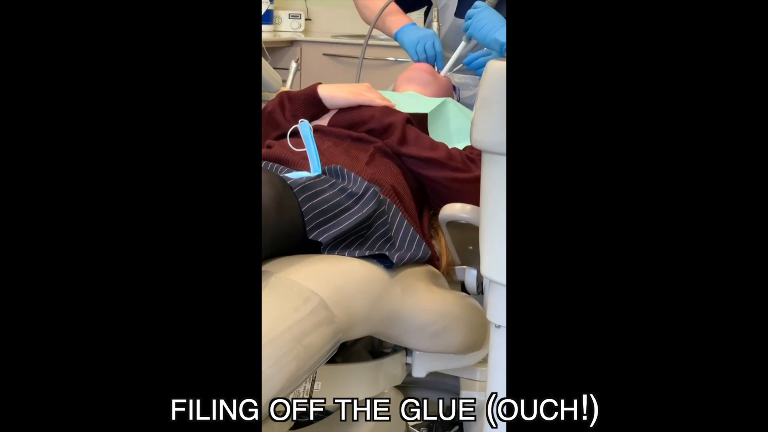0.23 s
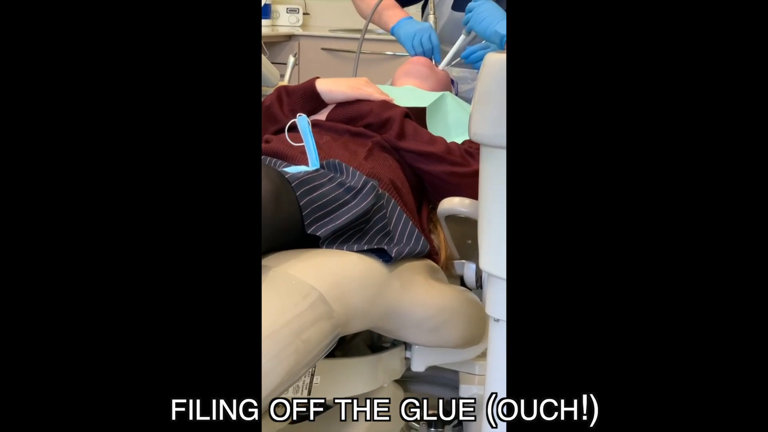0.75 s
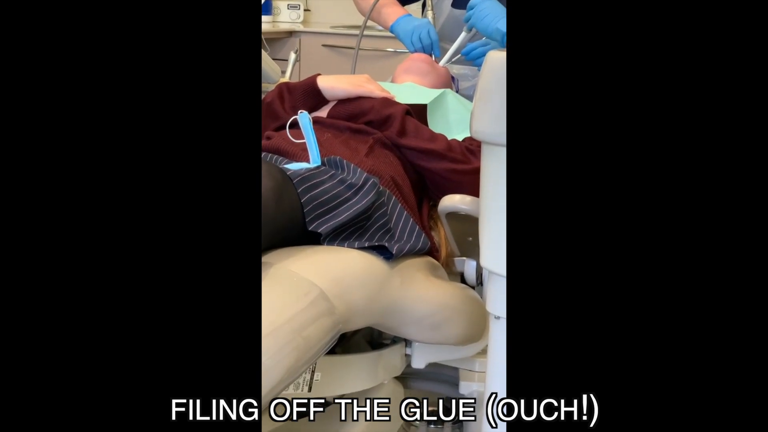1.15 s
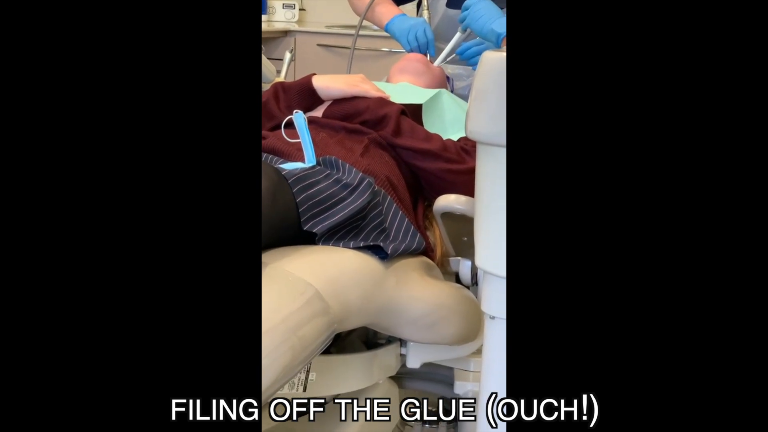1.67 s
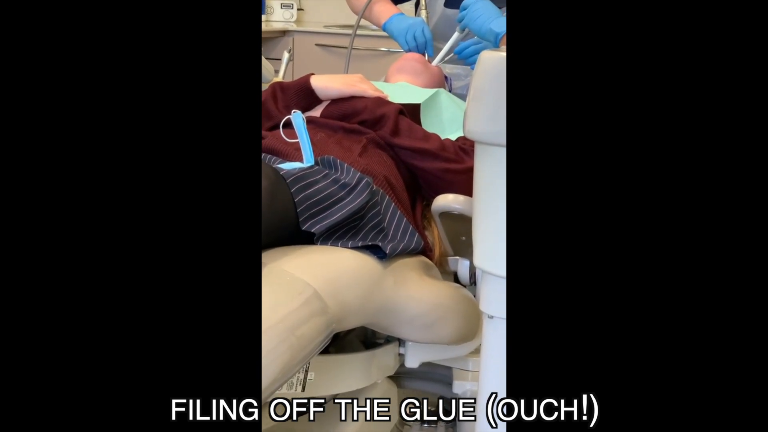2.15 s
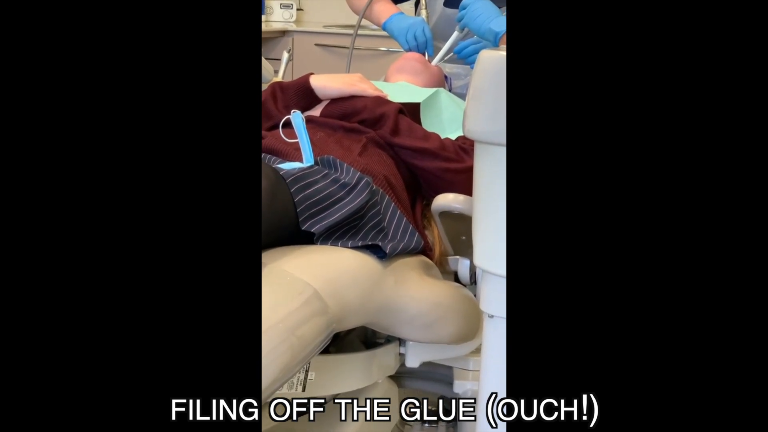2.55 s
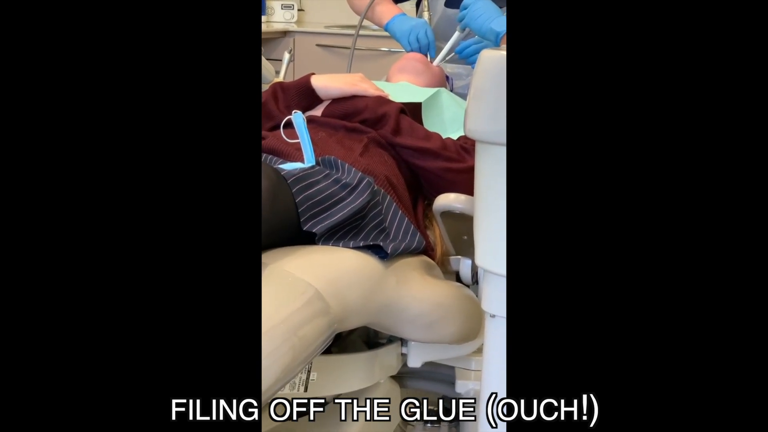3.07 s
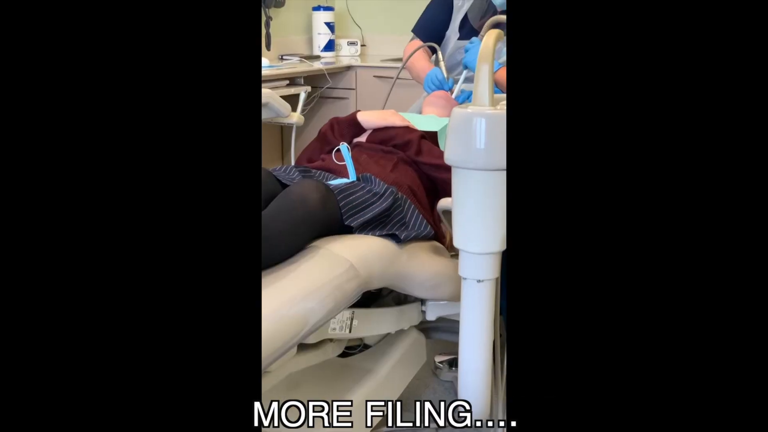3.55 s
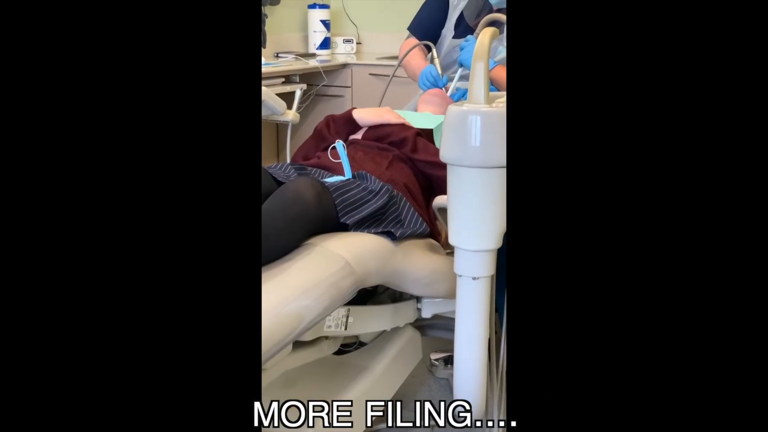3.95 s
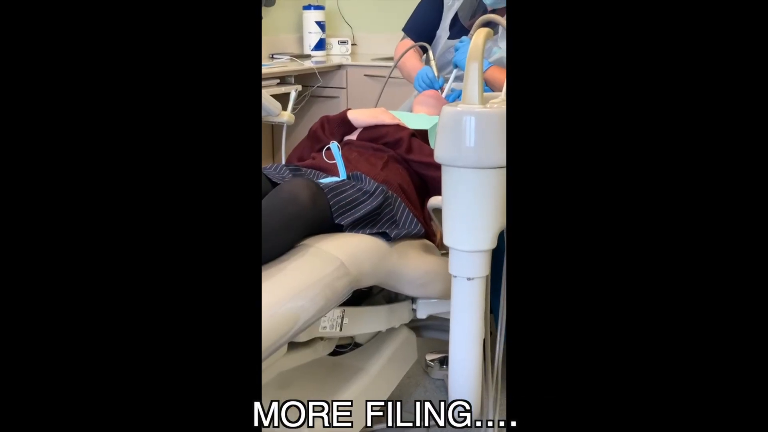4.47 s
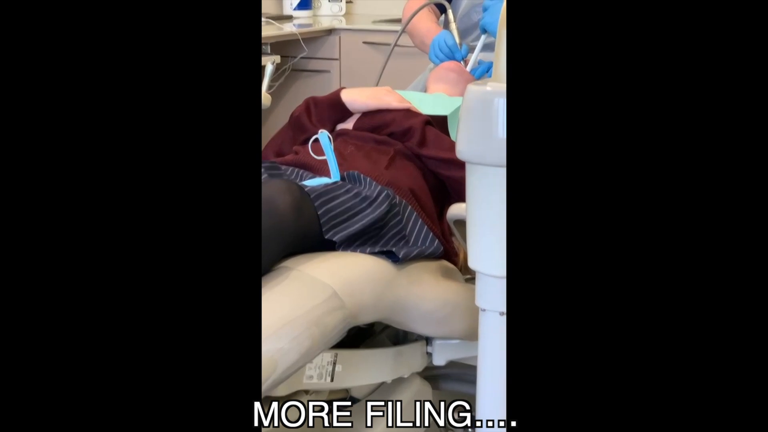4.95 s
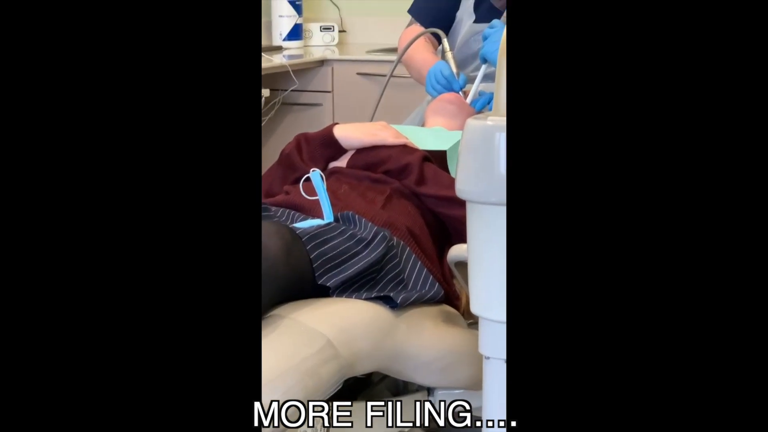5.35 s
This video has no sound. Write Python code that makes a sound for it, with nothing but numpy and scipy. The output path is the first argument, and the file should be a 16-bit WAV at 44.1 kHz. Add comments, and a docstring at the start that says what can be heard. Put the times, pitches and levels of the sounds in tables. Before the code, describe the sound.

Continuous high airy hiss of dental grinding and suction, picked up in stereo from near the chair. Short scraping bites brighten it, thin whistles waver and choke, and a few wet plops pop. Low pump throb, electrical hum, faint whine and ventilation fill the small room. After an abrupt cut just past halfway the air is more hollow and the hum stronger, then a heavy low drone rises while sinking in pitch.

```python
"""A dental handpiece grinds adhesive off teeth: a bright jet hiss that scrapes and spits grit as the bur bites.
In the same open mouth a suction tip hisses (noise through resonances) and whistles (narrow noise bands), and
saliva plops as short falling tones. Behind them in the small clinic stand a throbbing pump, mains hum, a thin
whine, a hollow hum and ventilation rumble, all heard in stereo. Part-way the scene jumps to a later moment
with the tip placed differently; near the end a low motor drone swells and sinks in pitch."""
import sys
import numpy as np
from scipy import signal
from scipy.fft import rfft, irfft
from scipy.io import wavfile

SR = 44100
rng = np.random.default_rng(int(sys.argv[2]) if len(sys.argv) > 2 else 0)


def transcribe(signal):
    """Save signal, clipped to [-1, 1], as a 16-bit WAV file at the path in sys.argv[1]."""
    frames = np.atleast_2d(signal).T
    limited = np.clip(frames, -1, 1)
    pcm = np.round(limited * 32767).astype(np.int16)
    wavfile.write(sys.argv[1], SR, pcm)


N = 247611
TIME = np.arange(N) / SR
FREQS = np.maximum(np.arange(N // 2 + 1) * SR / N, 1)


def from_db(db):
    """Decibels to gain."""
    return 10 ** (np.asarray(db) / 20)


def rms_one(x):
    """Scale to unit rms."""
    return x / np.sqrt(np.mean(x ** 2) + 1e-20)


def in_time(rows):
    """Each column of a curve at every sample."""
    seconds, *columns = np.transpose(rows)
    return [np.interp(TIME, seconds, column) for column in columns]


def over_hz(points, column=1):
    """A table joined by straight lines on a log-frequency axis."""
    table = np.transpose(points)
    return np.interp(np.log(FREQS), np.log(table[0]), table[column])


def fade_in(start, length):
    """A ramp from 0 to 1; start and length in seconds."""
    return np.clip((TIME - start) / length, 0, 1)


def drift(rate):
    """Random wander with unit rms, falling off steeply above a rate in Hz."""
    return rms_one(irfft(rfft(rng.standard_normal(N)) / (1 + (FREQS / rate) ** 2) ** 2, N))


def bend(pair, share):
    """Raise every pitch in a stereo sound by a share that changes with time."""
    steps = np.arange(N)
    read_at = (steps + np.cumsum(share)) % N
    return np.array([np.interp(read_at, steps, side) for side in pair])


def fine_ripple(depth_db, spread_s):
    """A random fine unevenness of the spectrum, in dB; a longer spread makes it finer."""
    dying_noise = rng.standard_normal(N) * np.exp(-np.minimum(TIME / spread_s, 50))
    return depth_db * rms_one(rfft(dying_noise).real)


# Left-right correlation of the hiss by frequency. Each row: frequency in Hz, correlation (0-1).
STEREO_LIKENESS = [(50, .999), (250, .93), (550, .62), (800, .42), (1500, .42), (2100, .4), (2500, .8),
                   (2850, .8), (3250, .68), (3850, .44), (4350, .52), (4580, 1), (5550, 1), (5850, .74),
                   (6450, .58), (7200, .92), (7700, 1), (9400, .99), (10200, .62), (10750, .64), (11100, 1)]
# Left-right phase of the hiss by frequency. Each row: frequency in Hz, phase by which left leads in radians.
STEREO_LEAD = [(50, 0), (560, -.5), (1000, .3), (1850, .65), (2400, 3.1), (3200, 3.1), (3950, 1.9),
               (4580, 3.14), (5550, 3.14), (6200, 4.3), (7200, 6.2), (9400, 6.28), (10200, 7.1),
               (11100, 9.425)]


def stereo_noise(colour_db, lead):
    """Noise of a given dB per Hz on two sides: a shared part, an unrelated part and a phase lead on the left."""
    mid, side = rfft(rng.standard_normal((2, N)))
    alike = np.clip(over_hz(STEREO_LIKENESS), 0, 1)
    sign = np.array([[1], [-1]])   # left, right
    pair = np.sqrt(1 + alike) * mid + sign * np.sqrt(1 - alike) * side
    pair = pair * np.exp(.5j * sign * lead)
    return irfft(pair * from_db(colour_db), N) * np.sqrt(SR) / 2


# Ventilation rumble of the clinic. Each row: frequency in Hz, density in dB relative to the room level.
ROOM_COLOUR = [(20, -4), (45, 5), (80, 2), (125, -5.5), (200, 0), (320, 0), (400, -2.5), (520, -7.5),
               (900, -20.5), (3000, -22)]


def ventilation(level_db):
    """Moving air fills the room with broad noise, heaviest in the lows."""
    return from_db(level_db) * stereo_noise(over_hz(ROOM_COLOUR), over_hz(STEREO_LEAD))


# The two notes of the hollow hum. Each row: pitch in Hz, level in dB relative to the swell.
HOLLOW_NOTES = [(257, -2.5), (287, -6)]
# Its swells out of a faint bed. Each row: start in seconds, swell level in dB at the top of the rise.
HOLLOW_RISES = [(0.85, -47.5), (2.6, -53.5)]
HOLLOW_BED_DB, HOLLOW_RISE_S, HOLLOW_FALL_DB_PER_S = -65.5, 0.13, 9.5


def hollow_hum(waver_rad):
    """Two close, unsteady tones that stay faint between swells: a quick rise, a slow fall."""
    swell = from_db(HOLLOW_BED_DB)
    for start, db in HOLLOW_RISES:
        falling_s = np.maximum(TIME - start - HOLLOW_RISE_S, 0)
        rise = fade_in(start, HOLLOW_RISE_S)
        swell = np.maximum(swell, rise * from_db(db - HOLLOW_FALL_DB_PER_S * falling_s))
    tones = 0
    for hz, db in HOLLOW_NOTES:
        tones = tones + from_db(db) * np.sin(2 * np.pi * hz * TIME + waver_rad * drift(2.6))
    return np.sqrt(2) * swell * tones


# Mains and machine tones. Each row: pitch in Hz, rms level in dB before the jump, rms level in dB after it.
HUM_TONES = [(99.8, -52, -40.5), (144.7, -59.5, -55), (199.4, -58.5, -68.5), (298.6, -55.5, -63),
             (337, -61.5, -55)]


def hum(late, waver_rad):
    """Steady tones of the equipment; the higher ones waver more in phase."""
    out = 0
    for hz, early_db, late_db in HUM_TONES:
        waver = waver_rad * (hz / HUM_TONES[0][0]) ** 2 * drift(20.0)
        phase = 2 * np.pi * (hz * TIME + rng.random()) + waver
        level_db = early_db + late * (late_db - early_db)
        out = out + np.sqrt(2) * np.sin(phase) * from_db(level_db)
    return out


# The pump's mean level at the top of its throb, before and after the jump.
PUMP_EARLY_DB, PUMP_LATE_DB = -42.5, -38
THROB_HZ, THROB_TROUGH_S, THROB_DEPTH = 2.98, .29, 0.7   # rate, time of one trough, depth (0-1)


def pump(late, hz, second_db, unsteady_db):
    """An induction motor just under mains speed throbs in long swells; its second order beats with the hum."""
    swell = np.abs(np.sin(np.pi * THROB_HZ * (TIME - THROB_TROUGH_S)))   # brief troughs
    throb = 1 - THROB_DEPTH * (1 - swell)
    level_db = PUMP_EARLY_DB + late * (PUMP_LATE_DB - PUMP_EARLY_DB) + unsteady_db * drift(7.4)
    phase = 2 * np.pi * np.cumsum(hz + 0.1 * drift(1.6)) / SR
    first = from_db(level_db) * throb * np.sin(phase)
    second = from_db(second_db) * np.sin(2 * phase)
    return np.sqrt(2) * (first + second)


# The swelling motor drone. Each row: time in seconds, pitch in Hz, rms level of the fundamental in dB.
DRONE_PATH = [(4.3, 46.1, -45), (4.52, 44, -39), (4.68, 44, -30), (4.87, 43.57, -28.5),
              (5.08, 42.37, -25.5), (5.61, 42, -23)]


def drone(second_db, third_db):
    """A heavy motor slows and grows louder, nearly a pure tone that beats against the pump."""
    hz, level_db = in_time(DRONE_PATH)
    phase = 2 * np.pi * np.cumsum(hz) / SR
    tone = np.sin(phase) + from_db(second_db) * np.sin(2 * phase) + from_db(third_db) * np.sin(3 * phase)
    return np.sqrt(2) * tone * from_db(level_db) * fade_in(DRONE_PATH[0][0], 0.058)


# A small motor's thin whine. Each row: time in seconds, level in dB, 2 dB above the mean whine,
# before the flicker.
WHINE_LEVEL = [(0, -52.5), (1.2, -55.5), (1.7, -48.5), (3.1, -52), (3.3, -66.5), (5.6, -56.5)]
WHINE_HZ = 1786   # centre pitch


def whine(waver_rad, wander_hz):
    """A small motor's tone, wavering in pitch and strength."""
    level_db, = in_time(WHINE_LEVEL)
    hz = WHINE_HZ + wander_hz * drift(5.8)
    phase = 2 * np.pi * np.cumsum(hz) / SR + waver_rad * drift(27)
    return np.sqrt(2) * np.sin(phase) * from_db(level_db - 2 + 4 * drift(25))


# Saliva bursting in the mouth. Each row: start in seconds, level in dB before the common gain,
# settled pitch in Hz, opening snap in dB relative to that level.
SALIVA_PLOPS = [(1.2875, -33, 644, -9), (1.314, -36, 745, -13), (1.6015, -34.5, 620, -8),
                (1.6203, -37.5, 720, -4), (3.131, -29.5, 600, -1.5), (3.857, -32.5, 690, -17),
                (4.5563, -30, 600, -14)]


def plops(gain_db, t60, sweep, sweep_s, snap_hz, snap_t60):
    """A film of saliva bursts with a brief snap, then a few cycles fall in pitch as the pocket opens."""
    out = np.zeros(N)
    t = TIME[:SR // 20]
    snap = from_db(-60 * t / snap_t60) * np.sin(2 * np.pi * snap_hz * t)
    for start, db, hz, snap_db in SALIVA_PLOPS:
        # the pitch starts a share "sweep" above hz and settles within a few times sweep_s seconds
        phase = 2 * np.pi * hz * (t + sweep * sweep_s * (1 - np.exp(-t / sweep_s)))
        pocket = np.sin(phase) * (1 - np.exp(-t / 0.00077)) * from_db(-60 * t / t60)
        at = round(start * SR)
        out[at:at + len(t)] += (pocket + from_db(snap_db) * snap) * from_db(db + gain_db)
    return out


# Whistles at the tip. Each row: pitch in Hz, width in Hz, dB per Hz at full draw before the jump,
# the same after it (both before the common gain), phase by which left leads in radians.
TIP_WHISTLES = [(1396, 19, -58, -78, 0.97), (2068, 22, -61, -84, 1.94), (4150, 80, -68.5, -92, 1.4)]
# Draw of the tip. Each row: time in seconds, level in dB; only the shortfall from its peak counts.
TIP_DRAW = [(0.0, -50.5), (1.1, -51), (1.7, -48), (2.4, -48.6), (2.85, -48), (3.25, -48.5)]
# Saliva briefly chokes the tip. Each row: centre in seconds, loss in dB.
TIP_CHOKES = [(0.38, 17), (0.75, 21), (1.06, 10), (1.53, 5)]
CHOKE_S = 0.06   # from the centre to 1/e of the loss
HIGH_WHISTLE_LOSS = 0.8   # extra loss of the higher whistles, dB per dB of missing draw
WHISTLE_SHARP_PER_DB = .0035   # a weak draw runs sharp: share of pitch per dB


def whistles(late, gain_db, flicker_db):
    """Edge tones at the tip: narrow, wavering resonances that grow with the draw and drop when it is choked."""
    draw_db, = in_time(TIP_DRAW)
    shortfall_db = draw_db.max() - draw_db
    choke_db = sum(db * np.exp(-((TIME - s) / CHOKE_S) ** 2) for s, db in TIP_CHOKES)
    sharp = WHISTLE_SHARP_PER_DB * shortfall_db + 0.003 * drift(10)
    out = 0
    for k, (hz, width, early_db, late_db, lead) in enumerate(TIP_WHISTLES):
        shape_db = -20 * np.log10(1 + ((FREQS - hz) / width) ** 2)
        level_db = early_db + late * (late_db - early_db)
        level_db = level_db - shortfall_db - choke_db + flicker_db * drift(14)
        if k > 0:
            level_db = level_db - HIGH_WHISTLE_LOSS * shortfall_db
        out = out + bend(stereo_noise(shape_db, lead), sharp) * from_db(level_db)
    return out * from_db(gain_db)


# Air through the tip. Each row: frequency in Hz, dB per Hz before resonances, ripple and gain.
AIR_RUSH = [(200, -83), (520, -83.5), (900, -78.5), (1300, -75), (1900, -81.5), (2500, -77), (3800, -75),
            (4400, -74.5), (5200, -128), (11500, -105)]
# Mouth and tip resonances before the jump. Each row: centre in Hz, width in Hz, lift in dB.
CAVITIES_EARLY = [(962, 160, 2.5), (1236, 150, 4), (1520, 280, 5), (1820, 140, 6), (2280, 70, 3),
                  (2420, 130, -3.5), (2950, 280, 8), (3220, 130, -5), (3500, 230, 5.5), (3800, 80, -2.5),
                  (4220, 300, 7)]
# The same after the jump. Each row: centre in Hz, width in Hz, lift in dB.
CAVITIES_LATE = [(775, 60, 4), (955, 40, 11), (1143, 150, 6), (1258, 50, 11), (1458, 90, 10.5),
                 (2170, 130, 6), (2330, 110, -3), (2800, 120, -3), (2960, 120, 5), (3100, 70, -3),
                 (3260, 150, 10), (3520, 260, 8.5), (3950, 330, -9), (4440, 170, 9.5)]
# Lower edges of the upper bands that flicker separately. Each entry: frequency in Hz.
FLICKER_FROM_HZ = (2200, 2650, 3100, 3700, 4200)
FLICKER_HZ, FLICKER_DB = 16, 1.2   # rate, depth
MOUTH_WANDER, MOUTH_WANDER_HZ = .008, 9   # tip and tongue move: share of pitch, rate


def suction(cavities, gain_db, flutter_db):
    """Turbulent air rings shifting cavities; the lows flutter and each upper band flickers at random."""
    lifts_db = sum(db / (1 + (2 * (FREQS - hz) / width) ** 2) for hz, width, db in cavities)
    rush = stereo_noise(over_hz(AIR_RUSH) + lifts_db, over_hz(STEREO_LEAD))
    air = rfft(bend(rush, MOUTH_WANDER * drift(MOUTH_WANDER_HZ)))
    band = np.searchsorted(FLICKER_FROM_HZ, FREQS)
    air = air * from_db((band > 0) * fine_ripple(2.2, spread_s=0.012))   # upper bands only
    out = irfft(air * (band == 0), N) * from_db(flutter_db * drift(29))
    for k in range(len(FLICKER_FROM_HZ)):
        flicker = rms_one(from_db(FLICKER_DB * drift(FLICKER_HZ)))
        out = out + irfft(air * (band == k + 1), N) * flicker
    return out * from_db(gain_db)


# Jet and grinding hiss. Each row: frequency in Hz, dB per Hz before the jump, dB per Hz after it,
# both before the fine ripple and the bites.
JET_COLOUR = [(3000, -100, -100), (4200, -84, -84), (4750, -76.6, -72), (5350, -73.8, -72.7),
              (5750, -69.6, -68.1), (6300, -71, -67.8), (6750, -71, -71.4), (7100, -70.5, -70.3),
              (7600, -72.8, -71), (8150, -68.5, -67.9), (8500, -70, -67.9), (8850, -71.9, -68.8),
              (9500, -69.8, -70.7), (10100, -71, -71.7), (10450, -71.3, -69.3), (10900, -75.3, -70.5),
              (11700, -76.5, -71.8)]
# Slow changes in the level of the jet hiss. Each row: time in seconds, level in dB.
JET_LEVEL = [(0.0, -0.8), (0.8, -0.8), (1.0, 0), (3.15, -0.6), (3.3, -0.2)]
# The bur bites into the adhesive. Each row: start in seconds, length to the release in seconds, rise in dB.
BUR_BITES = [(0.932, 0.14, 1), (1.424, 0.075, 2.5), (1.595, 0.13, 3), (1.872, 0.071, 2.5),
             (2.07, 0.13, 1.3), (2.55, 0.08, 2), (2.792, 0.12, 2.5), (3.503, .08, 1.1), (4.314, 0.039, 1.5)]
BITE_ATTACK_S, BITE_RELEASE_S = 0.024, 0.044
JET_WANDER_DB = 0.58   # how far the hand lets the jet wander


def handpiece(late, gain_db, turn_hz, scrape_db, grit_db, low_share):
    """A jet hiss; the harder the bur bites, the brighter it gets, scraping once a turn and spitting grit."""
    bite_db = 0
    for start, length, db in BUR_BITES:
        press = fade_in(start, BITE_ATTACK_S) - fade_in(start + length, BITE_RELEASE_S)
        bite_db = bite_db + db * press
    level_db = JET_WANDER_DB * drift(9.9) + bite_db
    bite = np.clip((level_db - np.percentile(level_db, 10)) / 4, 0, 1)
    rate_hz = turn_hz * (1 - 0.068 * bite + 0.024 * drift(6.7))   # the bur slows under load
    turn = 2 * np.pi * np.cumsum(rate_hz) / SR
    rough_db = scrape_db * np.sin(turn) + grit_db * drift(260) + 0.7 * drift(41)
    cutting_db = level_db + bite * rough_db
    before, after = (
        stereo_noise(over_hz(JET_COLOUR, column) + fine_ripple(1.9, spread_s=0.02), over_hz(STEREO_LEAD))
        for column in (1, 2))
    jet = np.sqrt(1 - late) * before + np.sqrt(late) * after
    low = irfft(rfft(jet) / (1 + (FREQS / 6500) ** 10), N)
    high = jet - low
    slow_db, = in_time(JET_LEVEL)
    # the low part follows the cutting only by its share, so bites brighten the hiss
    cut = low * from_db(low_share * cutting_db) + high * from_db(cutting_db)
    return from_db(gain_db + slow_db) * cut


JUMP_S = 3.228   # when the later moment begins


def scene():
    """The work in the mouth over the hum of the clinic."""
    late = fade_in(JUMP_S, 0.0003)   # 0 before the jump, 1 after it
    room = ventilation(level_db=-73.5) + hollow_hum(waver_rad=0.64)
    machines = hum(late, waver_rad=0.062) + pump(late, hz=48.1, second_db=-65.5, unsteady_db=1.5)
    machines = machines + drone(second_db=-24, third_db=-40) + whine(waver_rad=0.8, wander_hz=2)
    saliva = plops(gain_db=6, t60=0.02, sweep=0.93, sweep_s=0.00072, snap_hz=980, snap_t60=0.0056)
    early_air = suction(CAVITIES_EARLY, gain_db=0.13, flutter_db=1.2)
    late_air = suction(CAVITIES_LATE, gain_db=1.22, flutter_db=1.5)
    air = np.sqrt(1 - late) * early_air + np.sqrt(late) * late_air
    air = air * from_db(-1.5 * fade_in(4.5, 1.0))   # the suction eases toward the end
    air = air + whistles(late, gain_db=0.1, flicker_db=1.5)
    grinding = handpiece(late, gain_db=0, turn_hz=235, scrape_db=0.7, grit_db=0.5, low_share=0.35)
    return room + machines + saliva + air + grinding


# Balance of the two microphone sides. Each row: frequency in Hz, left minus right in dB.
STEREO_TILT = [(50, -.2), (140, -.8), (340, -1.8), (800, -2.3), (2000, -1.2), (4700, 0), (11400, 0)]
CUTOFF_HZ = 11650


def record(dry):
    """Each side of the microphone has a slightly different colour; the top is cut steeply."""
    tilt_db = over_hz(STEREO_TILT) * np.array([[.5], [-.5]])
    coloured = irfft(rfft(dry) * from_db(tilt_db), N)
    top_cut = signal.ellip(12, .1, 80, CUTOFF_HZ, fs=SR, output="sos")
    return signal.sosfilt(top_cut, coloured)


dry = scene()
out = record(dry)
transcribe(out)
```